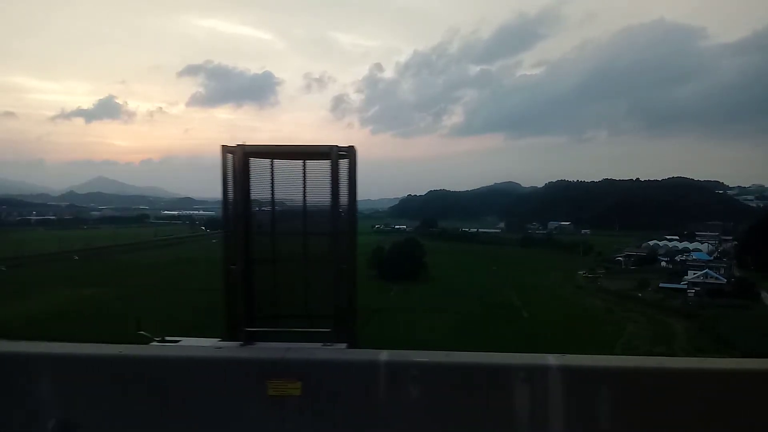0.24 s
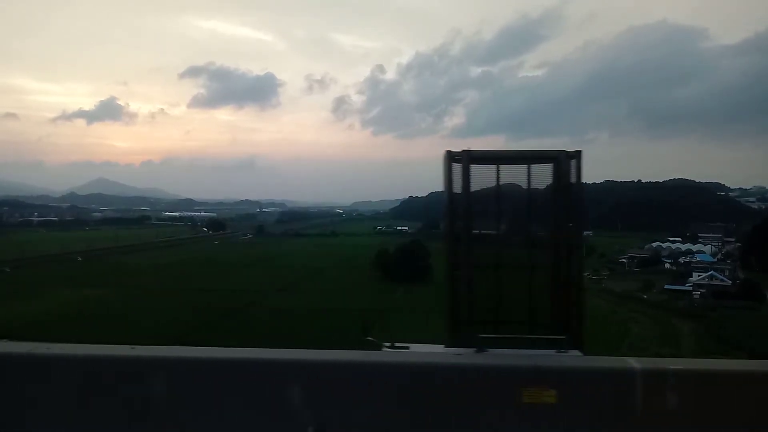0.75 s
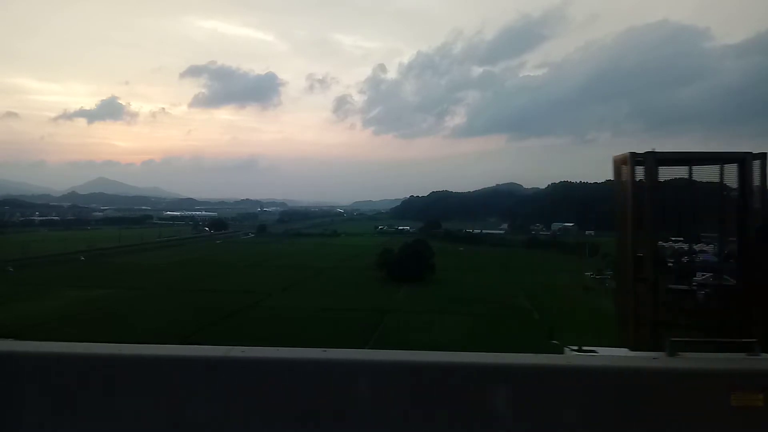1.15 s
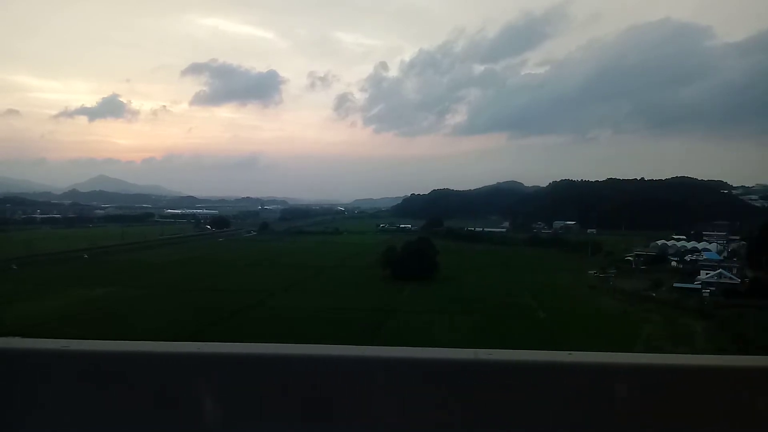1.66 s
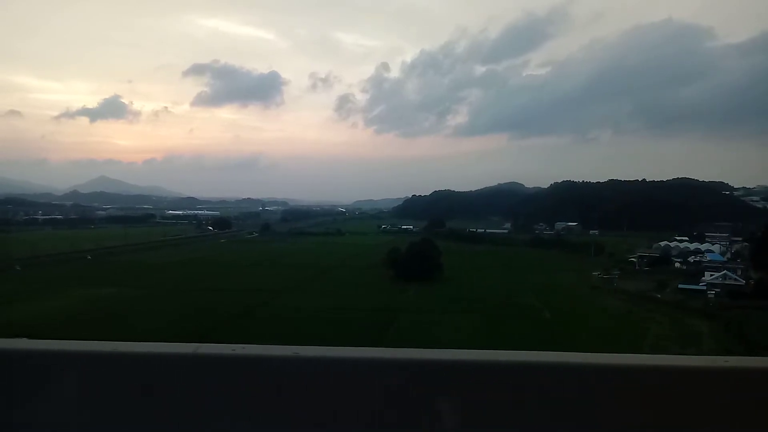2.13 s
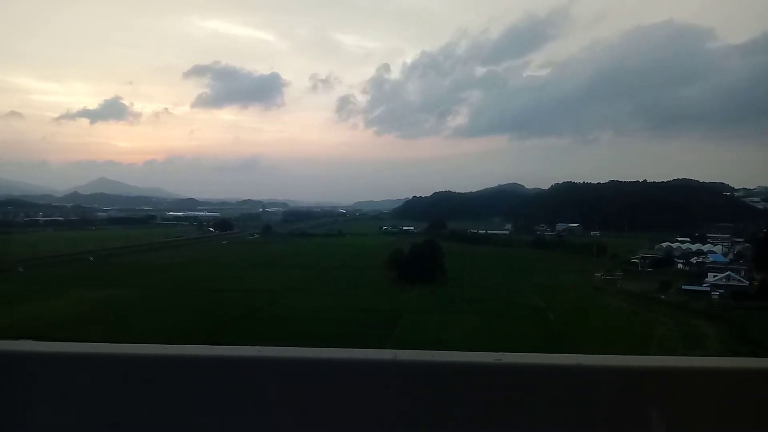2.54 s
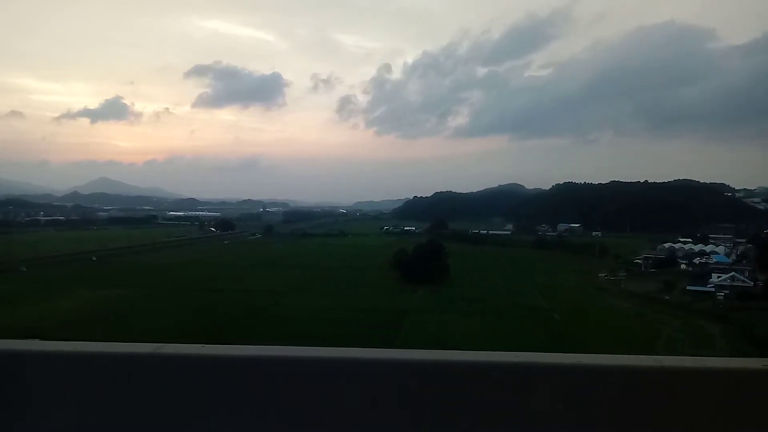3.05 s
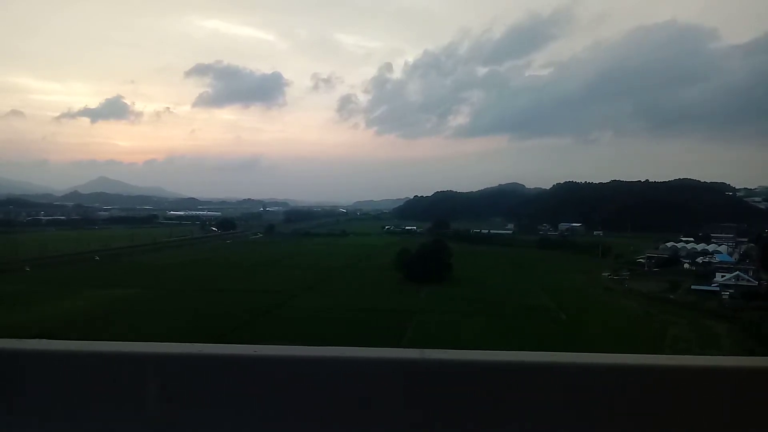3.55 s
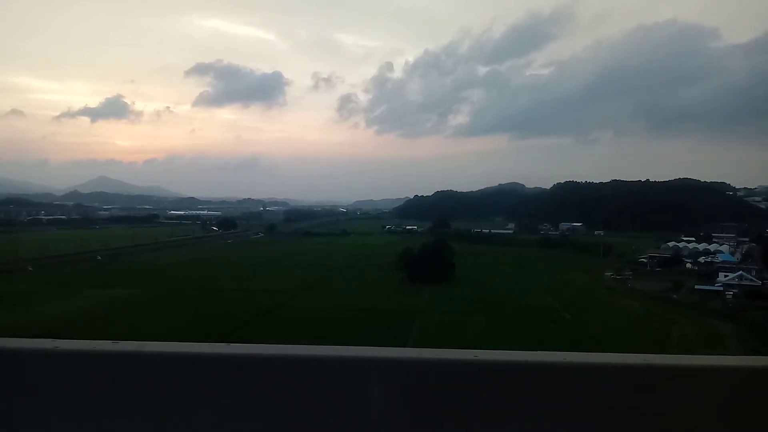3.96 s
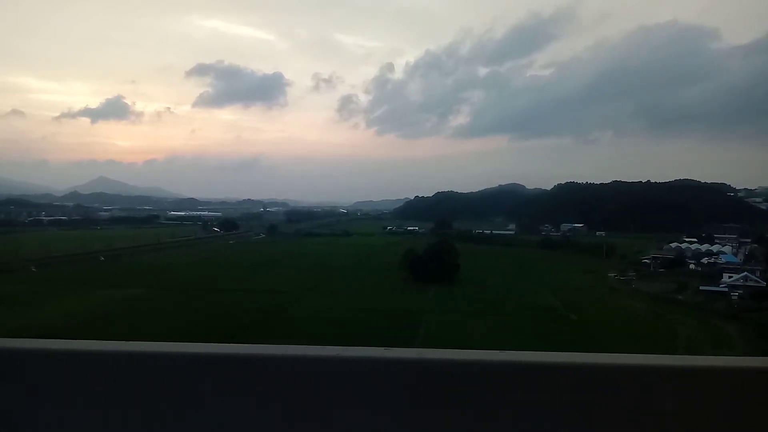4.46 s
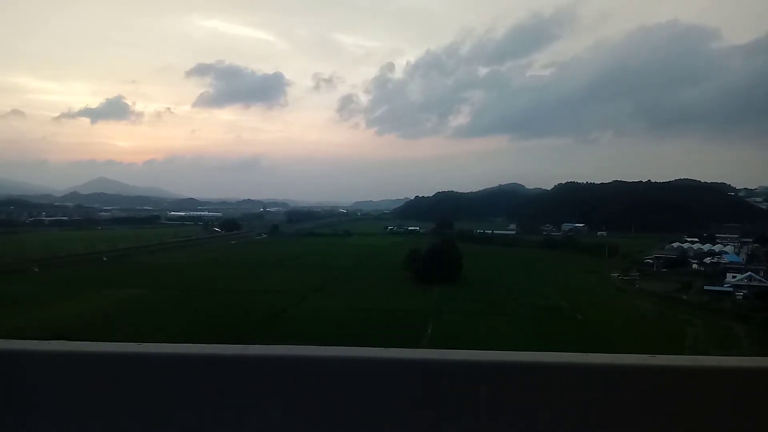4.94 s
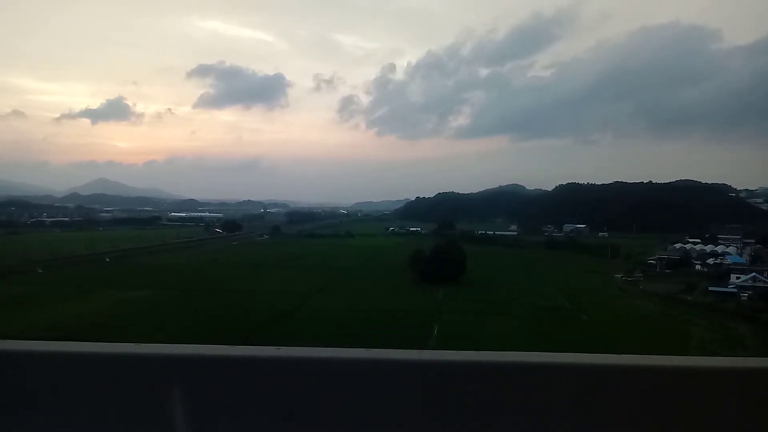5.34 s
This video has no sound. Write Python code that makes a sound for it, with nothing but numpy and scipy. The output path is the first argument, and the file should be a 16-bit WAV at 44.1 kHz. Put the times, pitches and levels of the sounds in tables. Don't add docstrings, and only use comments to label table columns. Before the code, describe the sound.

Steady bus cabin hum and road roar, the engine gradually pulling higher, dotted with plastic clicks and ending on a bright fabric swish.

```python
import sys
import numpy as np
from scipy import signal
from scipy.fft import rfft, irfft, next_fast_len
from scipy.io import wavfile
from scipy.ndimage import uniform_filter1d

SR = 44100
rng = np.random.default_rng(int(sys.argv[2]) if len(sys.argv) > 2 else 0)


def voltage_ratio(level):
    return 10 ** (np.asarray(level, float) / 20)


def dump(signal):
    limited = np.clip(np.atleast_2d(signal).T, -1, 1)
    pcm = np.round(limited * 32767).astype(np.int16)
    wavfile.write(sys.argv[1], SR, pcm)


N = 246915

# time_s, base_hz, effort_db
THROTTLE = [(0, 47.78, -1), (.3, 47.87, -0.5), (.42, 46.76, -2), (.57, 46.88, -1.5), (1.05, 47.64, 2.5),
            (1.26, 47.7, -1), (1.4, 47.84, 1), (1.54, 47.56, -0.5), (1.68, 47.84, 2), (1.82, 48.2, -1.5),
            (2.0, 48.45, 2), (2.45, 49.67, 0.5), (2.87, 50.13, 2), (3.2, 52.35, -1), (3.5, 53.04, -3.5),
            (4.0, 54.26, -1.5), (4.7, 57.27, -2.5), (5.6, 60.66, 1.5)]
# order, level_db
FIRING_ORDERS = [(2, -62.5), (3, -49), (4, -57), (6, -67)]
# pitch_hz, width_hz, boost_db
CABIN_MODES = [(113.2, 5, 17.5), (144.2, 6.1, 17.5), (189.6, 9.4, 10.5), (232.3, 12, 11.5),
               (300.6, 4.4, 15), (171, 11, 3)]
# order, level_db
MESH_ORDERS = [(18.0, -72), (20.55, -69)]
# pitch_hz, width_hz, boost_db
WALL_MODES = [(1016, 40, 13), (1085, 30, 11), (1125, 30, 8)]
# order, level_db
DRIVE_ORDERS = [(2.04, -62), (3.06, -62), (4.08, -54), (5, -55), (8.4, -67.5), (9.1, -66.5), (10, -54.5),
                (20, -61)]
# pitch_hz, width_hz, boost_db
FLOOR_MODES = [(87.3, 8.6, 13.5), (112.05, 1.5, 11.5), (124.8, 9.1, 9.5), (134.86, 7, 18), (148.2, 14, 11),
               (263, 9.1, 11), (270.5, 11, 13), (279.9, 6, 15.5), (307.3, 12, 9), (290, 6.2, 7)]
# time_s, load_db
TORQUE = [(0, 4.5), (.3, -9.5), (.6, -7), (1.0, 0.5), (1.4, -11.5), (1.9, -4), (2.3, -0.5), (3.35, 0.5),
          (3.7, 0), (4.1, -1.5), (4.7, -1), (5.2, -0.5), (5.6, 4.5)]
# time_s, rough_db
ROUGHNESS = [(0, 1.5), (.37, 1.5), (.9, -0.5), (2.1, 0), (2.65, 3), (3.2, 0.5), (4.0, -2.5), (4.5, -0.5),
             (4.75, -0.5), (5.1, 1.5), (5.35, -1), (5.6, 3.5)]
# pitch_hz, density_db_per_hz
RUMBLE_SPECTRUM = [(20, -21.5), (42, -17), (55, -9), (86, -2.5), (118, -1), (144, -1), (166, -5.5),
                   (200, 1), (220, -6), (270, -1), (330, -8), (400, -19), (520, -53.5)]
# pitch_hz, density_db_per_hz
ROAR_SPECTRUM = [(190, -27), (330, -2.5), (404, -3), (433, 0.5), (577, -2), (645, -0.5), (818, -5.5),
                 (871, -2.5), (934, -7), (994, -1.5), (1040, -2.5), (1180, -8.5), (1490, -8.5),
                 (1750, -21.5), (2280, -48), (3850, -120)]
# pitch_hz, density_db_per_hz
HISS_SPECTRUM = [(1500, -21.5), (1900, -11.5), (2150, -9), (2550, -14), (2800, -7), (3100, -16),
                 (4300, -16.5), (5000, -14.5), (6900, -18), (7600, -25.5), (9500, -27), (13900, -27),
                 (14500, -19.5), (15700, -17.5)]
# start_s, peak_db, pitch_hz
TICKS = [(0.2454, -64, 7060), (0.2663, -68, 5080), (.8093, -57.5, 4735), (0.835, -60, 5000),
         (1.492, -61, 4870), (2.136, -54.5, 5060), (2.1447, -59.5, 5150), (2.15, -51, 5080),
         (2.159, -49, 5020), (2.168, -54, 5200), (2.179, -53.5, 5200), (2.2193, -59, 4910),
         (2.231, -64, 4900), (2.2552, -57, 4900), (2.264, -65.5, 4900), (2.276, -64, 4960),
         (2.377, -56, 5170), (2.396, -55, 5190), (2.4187, -46, 5060), (2.434, -64, 5140),
         (2.445, -68, 6970), (2.4527, -64, 6960), (2.5513, -60, 4910), (5.108, -57, 5600),
         (5.4867, -61, 5360)]
# start_s, peak_db, pitch_hz, crack_db
SNAPS = [
    (2.204, -59.5, 6000, -71),
    (2.4072, -36.5, 5500, -78),
    (3.8296, -26, 5990, -59),
    (5.475, -50.5, 5130, -65),
]
# pitch_hz, width_hz, level_db
TRIM_MODES = [(4960, 390, -7), (5850, 800, 2.5), (6630, 520, -3.5)]
# pitch_hz, width_hz, level_db
PORT_MODES = [(8900, 1200, 0), (12000, 1000, -2), (15000, 1500, 2)]
# start_s, rise_s, fall_t60_s, low_band_db, high_band_db
BRUSHES = [
    (3.47, 0.044, 0.22, -68, -93),
    (3.828, 0.0081, 0.23, -56.5, -81),
    (3.985, 0.016, 0.25, -58, -79),
    (5.539, 0.008, 0.17, -42.5, -51.5),
]
# pitch_hz, density_db_per_hz
BRUSH_LOW = [(1600, -3.5), (1950, 3.5), (2130, -4.5), (2340, 2), (2600, -1), (2800, -8), (3000, -9.5),
             (3270, -13), (3600, -13), (4000, -34)]
# pitch_hz, density_db_per_hz
BRUSH_HIGH = [(4200, -11.5), (5000, -11), (5700, 1.5), (6100, -5.5), (6700, 4), (7200, -4), (7600, -23),
              (9000, -33), (16000, -45)]
# pitch_hz, width_hz, level_db
PANELS = [(1628, 110, -70.5), (1750, 200, -75), (1976, 120, -80), (2107, 140, -82.5), (2290, 190, -88),
          (2760, 380, -85.5), (3030, 260, -92.5)]
# centre_s, length_s, pitch_hz, level_db
BUZZES = [(.275, .027, 5300, -78), (.66, .14, 2090, -74), (.822, .03, 5240, -79), (.928, .04, 2780, -81),
          (2.162, .045, 5120, -64), (2.16, .04, 5950, -74), (2.187, .025, 6950, -77),
          (2.24, .07, 4880, -73), (2.25, .02, 6900, -81), (2.427, .06, 5150, -77), (2.428, .04, 6600, -77),
          (2.452, .025, 6950, -74), (3.488, .04, 5450, -80), (3.52, .1, 3126, -75),
          (3.846, .028, 5700, -69), (3.846, .028, 6500, -70), (3.85, .05, 3510, -76),
          (3.865, .08, 2434, -68), (4.013, .06, 2780, -69), (4.03, .09, 2200, -71), (4.235, .05, 2780, -77),
          (4.44, .06, 2780, -78), (4.45, .16, 2050, -73), (4.68, .084, 2127, -74), (5.553, .018, 2330, -52),
          (5.556, .018, 3210, -55), (5.582, .02, 2250, -58), (5.555, .023, 11390, -78),
          (5.553, .025, 15480, -79)]
# pitch_hz, level_db, swell_s, length_s, swell_db
AUXILIARY = [(85.3, -56, 2.4, 1.2, 5), (144.3, -54, 2.6, 1.3, 12), (1025, -68, .4, 1.2, 6),
             (1082, -70, 1.4, .3, 9), (146, -60, 3.9, .8, 9), (655, -66, 2.1, 1.5, 3)]


def engine():
    base_hz, effort_db = in_time(THROTTLE)
    firing = orders(base_hz, FIRING_ORDERS, CABIN_MODES, effort_db, flutter_db=-0.45, wander_share=0.0035)
    whine = orders(base_hz, MESH_ORDERS, WALL_MODES, 0, flutter_db=1.8, wander_share=0.0013)
    return firing + whine


def driveline():
    gear_ratio, lag_s = 1.875, 0.3
    base_hz, _ = in_time(THROTTLE)
    shaft_hz = uniform_filter1d(base_hz, int(lag_s * SR), mode="nearest") / gear_ratio
    torque_db, = in_time(TORQUE)
    return orders(shaft_hz, DRIVE_ORDERS, FLOOR_MODES, torque_db, flutter_db=1.6, wander_share=0.003)


def road():
    rumble_db, roar_db, hiss_db = -45, -48.5, -77
    rumble_db_per_hz, roar_db_per_hz = 0.163, 0.2062
    roar_share = 0.12
    rough_db, = in_time(ROUGHNESS)
    gained_hz = in_time(THROTTLE)[0] - THROTTLE[0][1]
    rumble_gain = voltage_ratio(rumble_db + rough_db + rumble_db_per_hz * gained_hz)
    roar_gain = voltage_ratio(roar_db + roar_share * rough_db + roar_db_per_hz * gained_hz)
    rumble = rumble_gain * coloured(RUMBLE_SPECTRUM, patchy_db=-1.5, rate_hz=2.2)
    roar = roar_gain * coloured(ROAR_SPECTRUM, patchy_db=2.08, rate_hz=21)
    hiss = voltage_ratio(hiss_db) * coloured(HISS_SPECTRUM, patchy_db=1.0, rate_hz=20)
    return rumble + roar + hiss


def ticks():
    soft_crack_db, chatter_db, chatter_t60_s, delay_s = -79, -15, 0.0078, 0.0009
    out = np.zeros(N + SR)
    t = np.arange(SR // 20) / SR
    slips = [(*row, soft_crack_db) for row in TICKS] + SNAPS
    for start_s, peak_db, pitch_hz, crack_db in slips:
        chatter = rng.standard_normal(len(t)) * voltage_ratio(chatter_db - 60 * t / chatter_t60_s)
        slip = (t == 0) + chatter
        body = resonate(slip, [(pitch_hz, 380, 22)]) + voltage_ratio(16.5) * resonate(slip, TRIM_MODES)
        crack = resonate(slip, PORT_MODES)
        at = round((start_s + delay_s) * SR)
        out[at:at + len(t)] += voltage_ratio(peak_db) * body + voltage_ratio(crack_db + 16) * crack
    high_pass = signal.cheby2(6, 30, 3900, "high", fs=SR, output="sos")
    return signal.sosfilt(high_pass, out[:N] + 1e-18)


def brushes():
    t = np.arange(N) / SR
    low, high = 0, 0
    for start_s, rise_s, t60_s, low_db, high_db in BRUSHES:
        rise = np.clip((t - start_s) / rise_s, 0, 1)
        shape = rise * voltage_ratio(-60 * np.maximum(t - start_s - rise_s, 0) / t60_s)
        low = low + voltage_ratio(low_db) * shape
        high = high + voltage_ratio(high_db) * shape
    low_noise = coloured(BRUSH_LOW, patchy_db=1.5, rate_hz=30)
    high_noise = coloured(BRUSH_HIGH, patchy_db=2.0, rate_hz=29)
    return low * low_noise + high * high_noise


def panels():
    t = np.arange(N) / SR
    white = rng.standard_normal(N)
    grainy = white * voltage_ratio(2.8 * drift(90))
    out = np.zeros(N)
    for pitch_hz, width_hz, level_db in PANELS:
        out += voltage_ratio(level_db + 4.4 * drift(9.6)) * narrow(white, pitch_hz, width_hz)
    for centre_s, length_s, pitch_hz, level_db in BUZZES:
        near = np.abs(t - centre_s) < 0.4
        swell = np.exp(-(2 * (t[near] - centre_s) / length_s) ** 2)
        out[near] += voltage_ratio(level_db) * swell * narrow(grainy[near], pitch_hz, 0.07 * pitch_hz)
    return out


def auxiliaries():
    t = np.arange(N) / SR
    out = np.zeros(N)
    for pitch_hz, level_db, swell_s, length_s, swell_db in AUXILIARY:
        swelling_db = level_db + swell_db * np.exp(-(2 * (t - swell_s) / length_s) ** 2)
        out += tone(pitch_hz, swelling_db, flutter_db=2.0, wander_hz=min(0.007 * pitch_hz, 3.5))
    return out


def orders(base_hz, table, modes, load_db, flutter_db, wander_share):
    out = 0
    coarse = np.arange(0, N, 256)
    for order, level_db in table:
        order_hz = order * base_hz
        lift = 1
        for mode_hz, width_hz, boost_db in modes:
            detune = 2 * (order_hz[coarse] - mode_hz) / width_hz
            lift = lift + voltage_ratio(2 * boost_db) / (1 + detune ** 2) ** 2
        gain = np.interp(np.arange(N), coarse, np.sqrt(lift))
        out = out + gain * tone(order_hz, level_db + load_db, flutter_db, wander_share * order_hz)
    return out


def tone(pitch_hz, level_db, flutter_db, wander_hz):
    cycles = np.cumsum(pitch_hz + wander_hz * drift(6.18)) / SR
    phase = 2 * np.pi * (cycles + rng.random())
    return np.sqrt(2) * voltage_ratio(level_db + flutter_db * drift(6.3)) * np.sin(phase)


def coloured(spectrum, patchy_db, rate_hz):
    size = next_fast_len(N)
    octave = np.log2(np.maximum(np.arange(size // 2 + 1) * SR / size, 1))
    pitch_hz, level_db = np.transpose(spectrum)
    edges = np.log2(pitch_hz)
    shaped = rfft(rng.standard_normal(size)) * voltage_ratio(np.interp(octave, edges, level_db, -90, -90))
    out = np.zeros(N)
    for centre in np.arange(edges[0] // 0.5 * 0.5, edges[-1] + 0.5, 0.5):
        share = np.clip(1 - 2 * np.abs(octave - centre), 0, 1)
        out += irfft(shaped * share, size)[:N] * voltage_ratio(patchy_db * drift(rate_hz))
    return rms_one(out)


def resonate(x, modes):
    out = 0
    for k, (pitch_hz, width_hz, level_db) in enumerate(modes):
        r = np.exp(-np.pi * width_hz / SR)
        zeros = [(1 - r * r) / 2, 0, (r * r - 1) / 2]
        poles = [1, -2 * r * np.cos(2 * np.pi * pitch_hz / SR), r * r]
        out = out + (-1) ** k * voltage_ratio(level_db) * signal.lfilter(zeros, poles, x)
    return out


def narrow(x, pitch_hz, width_hz):
    mode = [(pitch_hz, width_hz, 0)]
    return rms_one(resonate(resonate(x, mode), mode))


def drift(rate_hz):
    hop = 40
    r = np.exp(-2 * np.pi * rate_hz * hop / SR)
    noise = rng.standard_normal(N // hop + 2002)
    slow = signal.lfilter([1], [1, -2 * r, r * r], noise)[2000:]
    return np.interp(np.arange(N) / hop, np.arange(len(slow)), rms_one(slow))


def in_time(rows):
    time_s, *columns = np.transpose(rows)
    return [np.interp(np.arange(N) / SR, time_s, column) for column in columns]


def rms_one(x):
    return x / np.sqrt(np.mean(x ** 2) + 1e-20)


def scene():
    bus = engine() + driveline() + road()
    cabin = ticks() + brushes() + panels() + auxiliaries()
    return (bus + cabin)[None]


def low_pass(x):
    return signal.sosfilt(signal.butter(12, 17110, fs=SR, output="sos"), x)


def record(dry):
    low_cut_hz = 46
    low_cut = signal.butter(3, low_cut_hz, "high", fs=SR, output="sos")
    thin = signal.sosfilt(low_cut, dry)
    return low_pass(thin)


dry = scene()
out = record(dry)
dump(out)
```